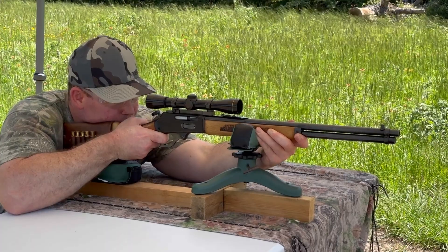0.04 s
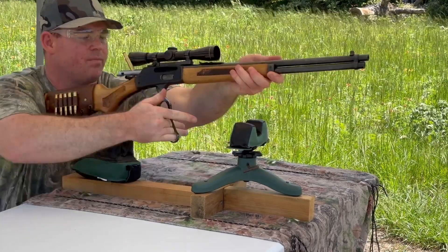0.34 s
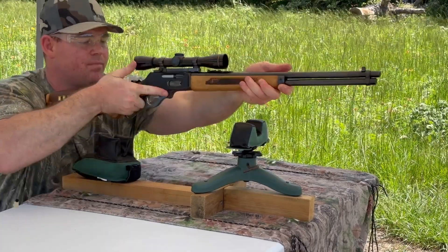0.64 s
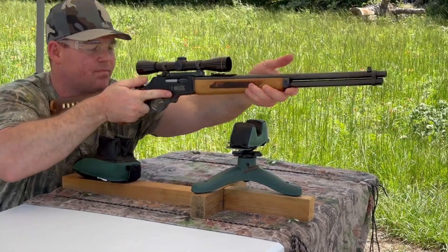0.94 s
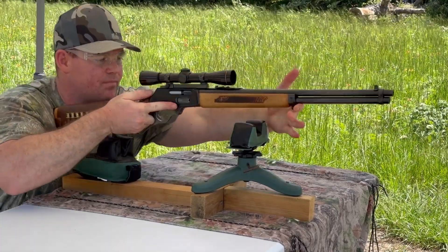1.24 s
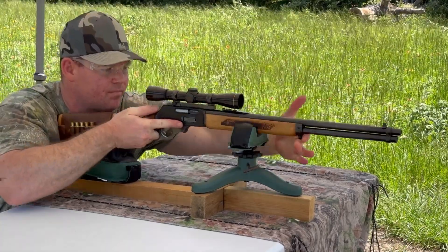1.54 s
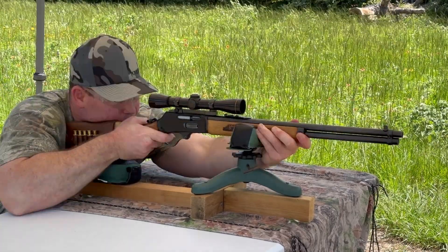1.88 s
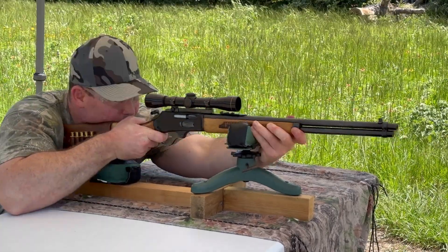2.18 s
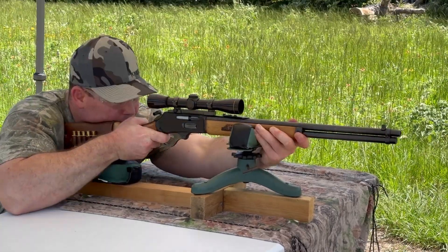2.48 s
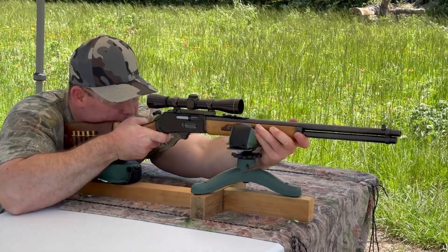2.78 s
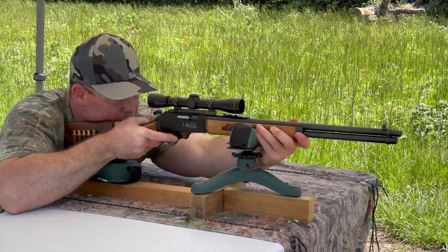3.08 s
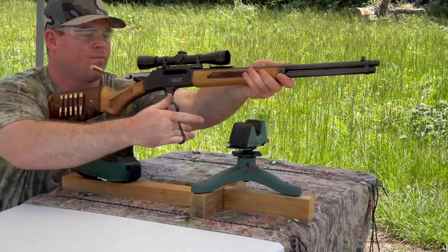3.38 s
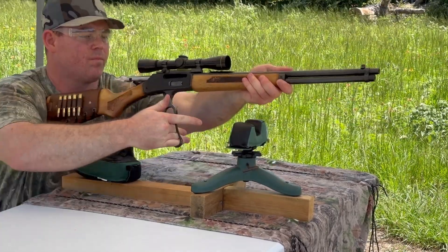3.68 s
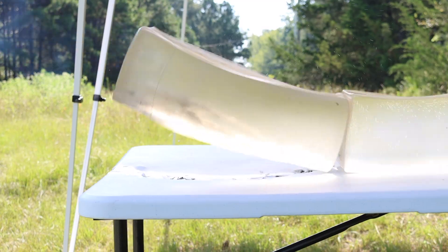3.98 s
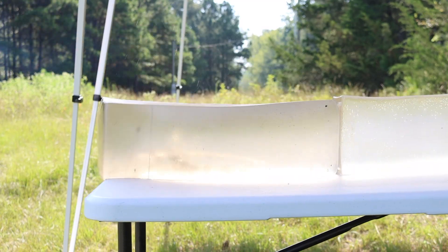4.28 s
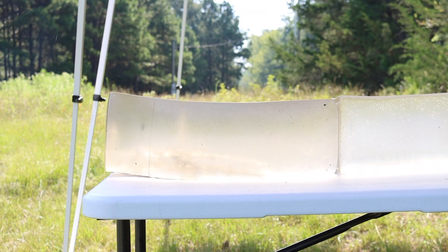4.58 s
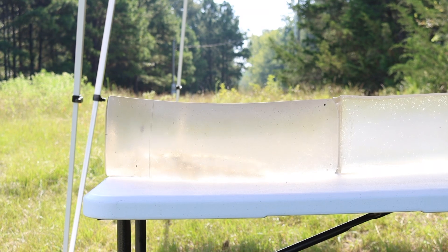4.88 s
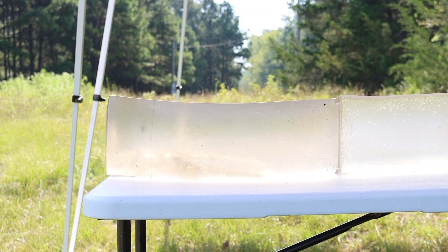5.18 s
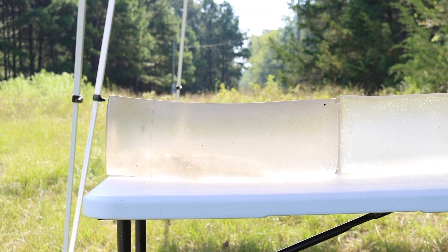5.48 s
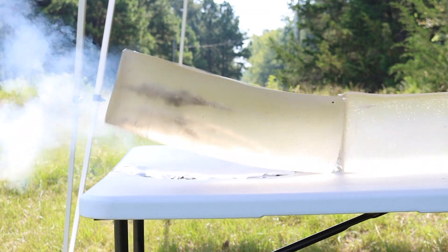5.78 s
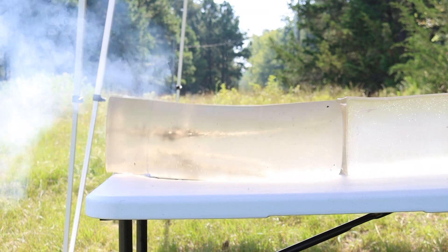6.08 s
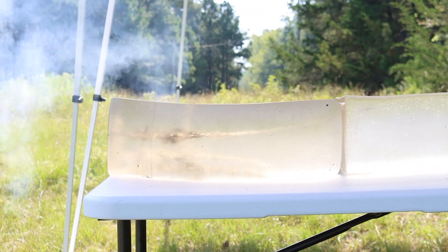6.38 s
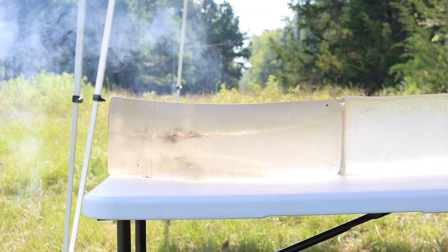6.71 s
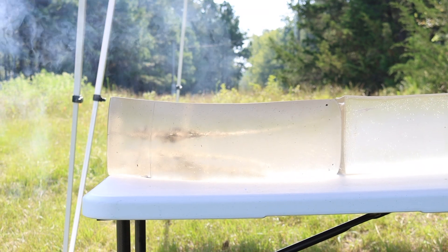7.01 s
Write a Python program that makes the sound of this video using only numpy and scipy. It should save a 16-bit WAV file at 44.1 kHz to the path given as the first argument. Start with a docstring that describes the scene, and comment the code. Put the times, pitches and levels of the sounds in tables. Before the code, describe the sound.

Outdoors, a rifle's lever clacks open and shut close to the microphone, and the empty brass case rings, thuds on a plastic table and bounces to rest. A sharp shot rolls back from the trees, and the lever opens again. The sound then shifts to a field, where two more shots crack about two seconds apart, each with a quick thump and a long echo, over faint insects and a low hum.

```python
"""Rifle shots and their echoes

At an outdoor bench a rifle's lever rattles, the empty brass case rings, drops and bounces, and a shot
rolls back from the trees. Two more shots follow in a field, beside a gel block on a table, where insects
sing and something hums. Each blast is short and choked; its echo swells up and dies away, treble first."""
import sys
import numpy as np
from scipy import signal
from scipy.fft import rfft, irfft
from scipy.io import wavfile
from scipy.ndimage import uniform_filter1d

SR = 44100
rng = np.random.default_rng(int(sys.argv[2]) if len(sys.argv) > 2 else 0)


def wrap_up_sound(samples):
    """Save the sound to the file named by the first command line argument, as 16-bit audio."""
    columns = np.atleast_2d(samples).T
    # keep every value between -1 and 1, then stretch to whole-number steps
    tamed = np.clip(columns, -1, 1)
    steps = np.round(tamed * 32767).astype(np.int16)
    wavfile.write(sys.argv[1], SR, steps)


N = 319725
TIME = np.arange(N) / SR
BINS = np.fft.rfftfreq(4096, 1 / SR)  # the pitches at which filters are set [Hz]
BENCH_SHOT_S, SCENE_CHANGE_S, FIELD_START_S = 2.178, 3.8, 3.838

# how alike left and right are, for close sounds and all around each place: (pitch [Hz], likeness [-1 to 1])
CLOSE = [(100, 0.89), (2000, 1), (5000, 0.85), (8000, 0.36), (11000, .25), (16000, .3)]
BENCH_LIKENESS = [(30, .8), (80, .93), (200, .78), (450, 0.31), (1400, 0.22), (2200, 0.99), (5000, 0.88),
                  (8000, .3), (16000, .2)]
FIELD_LIKENESS = [(30, 0.89), (100, 1), (250, 0.96), (600, 0.67), (1300, .25), (2500, -0.15),
                  (5000, -0.026), (8000, 0.26), (16000, -0.24)]
# tone of the outdoor background at each place: (pitch [Hz], level [dB])
BENCH_AIR = [(20, -30), (40, -6.5), (70, 0), (150, -3.5), (230, -14), (480, -21), (900, -26.5), (1500, -30),
             (3000, -34), (4900, -30), (6000, -34), (7400, -31), (10000, -38.5), (14500, -30.5),
             (16000, -34)]
FIELD_AIR = [(25, -23), (55, -8.5), (85, 1), (140, -5), (260, -1.5), (400, -15.5), (900, -21), (1500, -27),
             (2500, -22.5), (4000, -14.5), (7500, -18.5), (10000, -24.5), (15500, -37.5)]
# how the bench background rises and falls: (time [s], level [dB])
BENCH_AIR_LEVELS = [(0, -63.5), (0.8, -51.5), (1.5, -52), (2.1, -53.5), (3.1, -59), (3.45, -54.5),
                    (3.785, -60.5), (3.795, -100)]
# tone of the echo at its height: (pitch [Hz], level [dB])
BENCH_ECHO = [(18, -38), (30, -14), (174, -1.5), (319, -15), (666, -5), (1130, -9.5), (2170, -9.5),
              (3980, -19), (6720, -18), (7670, -21.5), (8300, -57), (8980, -29.5), (9710, -24),
              (14000, -44.5), (16000, -49)]
FIELD_ECHO = [(24, -54.5), (40, -55), (81, -12), (155, -2.5), (392, -10.5), (965, -1.5), (1090, -3),
              (1630, -1.5), (2440, -5.5), (3740, -15), (5050, -16), (6020, -21), (10700, -27), (13100, -33),
              (16000, -84)]
# how each pitch of the echo gains or fades against the whole: (pitch [Hz], change [dB per s])
BENCH_FADE = [(60, 5), (200, 4), (400, -1.5), (1000, 8), (2500, -0.5), (5000, -10.5), (10000, -21.5),
              (16000, -42.5)]
FIELD_FADE = [(60, -12), (200, 4.5), (400, 10), (900, 10), (2000, -1.5), (4000, -5), (8000, -31),
              (16000, -60)]
# echoes at the bench, the first from a shot already fired: (shot time [s], level [dB], end [s])
BENCH_ROLLS = [(-0.95, -26, 0.156), (BENCH_SHOT_S, -26.5, 3.17)]
# a faint, dull roll from far off: (start [s], level [dB], end [s])
FAR_ROLL = (1.13, -44.5, 1.63)
# single returns that stand out of the echo: (time [s], level [dB], fade time [s])
SLAPS = [(2.408, -21.5, 0.052), (2.567, -25, 0.067), (2.784, -32, 0.24), (4.179, -26.5, 0.18),
         (6.2, -28, 0.027)]
# tone of the rifle's steel parts: (pitch [Hz], level [dB])
STEEL_TONE = [(120, -69), (200, -17), (601, -10.5), (735, -9.5), (950, -0.5), (1210, -7), (2910, 0.5),
              (3620, -5.5), (6640, -3.5), (8270, -12), (8900, -4.5), (9750, -1), (11700, -9.5), (14600, -7),
              (16000, -25.5)]
# ringing notes of the rifle's steel frame: (pitch [Hz], level [dB], fade time [s])
FRAME_NOTES = [(1696, -13.5, .04), (2800, -6, 0.048), (3140, -5.5, 0.049), (3460, -8, 0.03),
               (5300, -27.5, 0.02)]
# the lever opens, shuts and opens: (start [s], stop [s], scrape [dB], ring [dB])
STROKES = [(0.188, 0.2784, -32, -18), (0.431, 0.542, -35, -30.5), (3.182, 3.268, -33, -37)]
# hammer, lifter and lock knock: (time [s], level [dB], fade time [s], treble tilt [dB per octave])
KNOCKS = [(0.1928, -34, .07, 4), (0.2026, -26, 0.075, 9), (0.2092, -25.5, .015, -2),
          (0.2392, -27, .03, 3.5), (0.2515, -28, .065, 5), (0.2801, -20, 0.037, 2.5),
          (0.436, -31, 0.057, -1), (0.4541, -20.5, 0.065, 2.5), (0.4989, -22.5, 0.028, 3),
          (0.527, -16, .08, 0.5), (0.5361, -14, .06, 3.5), (0.546, -20.5, .075, 1.5),
          (3.194, -22.5, 0.036, -0.5), (3.2097, -31.5, 0.029, -5), (3.2334, -26, .022, 1.5),
          (3.2585, -23, .027, -2.5), (3.2732, -21.5, 0.066, -0.5)]
# ringing notes of the brass case: (pitch [Hz], level [dB], fade time [s])
BRASS_NOTES = [(7270, -26, 0.19), (10820, -15.5, 0.24), (12300, -6.5, .13), (12310, -4, 0.19),
               (12400, -11, 0.21), (15300, -17.5, .12), (15290, -12, .13)]
# the empty case is flicked out: (time [s], level [dB])
EJECTIONS = [(0.282, -15.5), (3.273, -16)]
# it lands on the plastic table top: (time [s], level [dB], fade time [s])
LANDING = (0.6245, -11, 0.095)
# tone of the table's thud: (pitch [Hz], level [dB])
TABLE_TONE = [(47, -35.5), (80, -15.5), (130, 4), (316, -3), (451, -9), (734, -5.5), (1090, -19.5),
              (1900, -22.5), (2380, -10.5), (3320, -26), (6450, -28), (8410, -41.5), (12800, -39.5),
              (16000, -50.5)]
# tone of the hard surface where the case bounces: (pitch [Hz], level [dB])
SURFACE_TONE = [(150, 0.5), (450, 1), (1150, 1.5), (1500, -1), (2100, -4), (2650, -2.5), (3150, -10.5),
                (3800, -11), (4500, -13), (5700, -12), (7000, -20.5), (10000, -17.5), (16000, -25)]
# ringing notes of the table and of each bounce: (pitch [Hz], level [dB], fade time [s])
TABLE_NOTES = [(133.9, -12.5, 0.33), (185.4, -7.5, 0.17), (294.5, -12.5, 0.053), (454, -12, 0.1),
               (574, -5.5, 0.077), (729, -9, 0.079), (2340, -0.5, 0.034)]
BOUNCE_NOTES = [(1170, -5.5, 0.11), (1485, 4, 0.04), (1763, -8, 0.06), (2550, 0.5, 0.034),
                (2700, -4, 0.037), (3570, 3, 0.032), (3690, -5.5, 0.032), (5260, -8, 0.039)]
# a brief ring as the rifle fires: (pitch [Hz], level [dB], fade time [s])
FIRING_NOTES = [(1720, -25.5, 0.042), (2505, -25.5, 0.055)]
# bands of insect song: (pitch [Hz], width [Hz], level [dB])
INSECT_BANDS = [(4750, 760, -3.5), (8220, 880, 0.5)]
# notes of the low hum: (pitch [Hz], level [dB])
HUM_NOTES = [(79.5, -47.5), (161, -53), (243, -52.5)]
# shots in the field: (time [s], crack [dB], gas [dB], gas hold [s], thump delay [s], thump [dB],
# echo [dB], time until the background is back [s])
FIELD_SHOTS = [(3.8793, -21, -25, 0.013, 0.1056, -10.5, -23.5, 1.56),
               (5.7242, -17.5, -22, 0.013, 0.1037, -13, -22.5, 1.28)]
# the block and debris settle: (time [s], level [dB], fade time [s], lowest pitch [Hz], highest pitch [Hz])
TICKS = [(4.085, -41, 0.067, 11500, 13000), (4.694, -42, 0.072, 5000, 9600),
         (5.995, -29, 0.079, 8100, 10300), (6.492, -33.5, 0.096, 5760, 10500)]
# thin rings after the last shot: (time [s], level [dB])
PINGS = [(5.92, -40), (6.04, -40), (6.205, -34.5)]
# their one note: (pitch [Hz], level [dB], fade time [s])
PING_NOTE = [(5170, 0, 0.22)]


def amp(db):
    """Turns decibels into a gain to multiply by."""
    return 10 ** (np.asarray(db) / 20)


def evened(x):
    """Scales a signal to an average power of 1."""
    return x / np.sqrt(np.mean(x ** 2) + 1e-20)


def read(points, hz=BINS):
    """Reads a table at the given pitches, blending between its rows."""
    pitch, value = np.transpose(points)
    return np.interp(np.log(hz + 1), np.log(pitch + 1), value)


def gate(start, end, ramp):
    """1 between two times, with straight ramps to 0 outside them."""
    return np.clip(1 + np.minimum(TIME - start, end - TIME) / ramp, 0, 1)


def dying(age, fade):
    """Stays at 1 until age 0, then drops 60 dB in every fade time."""
    return np.exp(-np.log(1000) * np.maximum(age, 0) / fade)


def wobble(size):
    """A random wander, smoothed over size samples."""
    return evened(uniform_filter1d(rng.standard_normal(N), size))


def add(mix, s, sound):
    """Mixes a stereo sound in, starting at s seconds."""
    part = mix[:, round(s * SR):][:, :sound.shape[1]]
    part += sound[:, :part.shape[1]]


def noise(likeness, size=N):
    """Stereo hiss; a table or one number says how alike the two sides are."""
    a, b = rfft(rng.standard_normal((2, size)))
    same = likeness if np.isscalar(likeness) else read(likeness, np.fft.rfftfreq(size, 1 / SR))
    mid, side = a * np.sqrt((1 + same) / 2), b * np.sqrt((1 - same) / 2)
    return irfft([mid + side, mid - side], size)


def colour(x, db):
    """Filters a sound to the tone curve db, with no ringing ahead of the sound."""
    log_gain = np.log(amp(np.maximum(db - db.max(), -100)))
    mirrored = np.r_[log_gain, log_gain[-2:0:-1]]
    taps = np.fft.ifft(np.exp(np.conj(signal.hilbert(mirrored)))).real
    return signal.oaconvolve(x, taps[None], axes=1)[:, :x.shape[1]]


def band(low_hz, high_hz, order=6):
    """Tone curve in dB that keeps one range of pitches; a higher order has steeper edges."""
    return -10 * np.log10((1 + (low_hz / (BINS + 1)) ** (order - 2)) * (1 + (BINS / high_hz) ** order))


def hiss(db, likeness):
    """Steady noise with the tone curve db."""
    return evened(colour(noise(likeness), db))


def strike(rise, fade):
    """Loudness of a hit: it climbs to 1 in rise seconds, then dies away."""
    t = TIME[:16384]
    return np.sin(np.pi / 2 * np.minimum(t / rise, 1)) ** 2 * dying(t - rise, fade)


def burst(db, rise, fade, likeness=CLOSE):
    """A dying cloud of vibrations with the tone curve db."""
    shape = strike(rise, fade)
    return evened(colour(noise(likeness, len(shape)) * shape, db)) * np.sqrt(np.mean(shape ** 2))


def ring(notes, rise, spread):
    """Pure notes that die away; spread is how far left and right are out of step, in radians."""
    out = 0
    for hz, db, fade in notes:
        shape = strike(rise, fade)
        phase = rng.uniform(0, 2 * np.pi) + spread * rng.choice([-.5, .5]) * np.array([[1], [-1]])
        out = out + amp(db) * shape * np.sin(2 * np.pi * hz * TIME[:len(shape)] + phase)
    return out


def gas(db, hz, rise, fade, same):
    """A puff of blast noise between two pitches; same is its left-right likeness."""
    return amp(db) * burst(band(*hz), rise, fade, same)


def thump(db, hz, rise, fade, lag=0):
    """A quickly dying swing of air pressure, lag seconds later in the right ear."""
    shape = strike(rise, fade)
    t = TIME[:len(shape)]
    shape = np.where(t < rise, np.sqrt(shape), shape)  # pressure builds steeply
    swing = shape * np.cos(2 * np.pi * hz * (t - np.array([[0], [lag]])))
    balanced = colour(swing, band(0.42 * hz, 2500))  # push and pull cancel, leaving no steady pressure
    return amp(db) * amp([[1.1], [-1.1]]) * balanced


def bench_air():
    """Distant rumble and hiss around the bench, a little to the left."""
    s, db = np.transpose(BENCH_AIR_LEVELS)
    loudness = amp(np.interp(TIME, s, db, right=-200))
    return hiss(read(BENCH_AIR), BENCH_LIKENESS) * loudness * amp([[.9], [-.9]])


def roll(shot_s, db, end_s, crest_db, loss_db_per_s):
    """Loudness of an echo: it swells from the edge of the wood, then spreads out and is soaked up."""
    edge_s, swell_s, depth_s = 0.13, 0.045, 0.43
    age = TIME - shot_s
    swell = 1 - np.exp(-np.maximum(age - edge_s, 0) / swell_s)
    swell *= amp(-crest_db * np.clip(1 - age / depth_s, 0, 1))
    swell = np.maximum(swell, amp(-25.5))  # open ground scatters a little back first
    late = np.maximum(age, depth_s)
    spreading_db = 8 * np.log2(late / depth_s)  # 8 dB for each doubling of the path
    absorbed_db = loss_db_per_s * (late - depth_s)
    return amp(db - spreading_db - absorbed_db) * swell * gate(shot_s, end_s, ramp=0.0034)


def echo(height_s, tone, fade, likeness, lumpy_db, patchy_db):
    """Countless trunks throw the blast back; later returns have crossed more air and are duller."""
    lumps = amp(lumpy_db * wobble(90))
    hz, t, slices = signal.stft(noise(likeness) * lumps, SR, nperseg=1024)
    age = np.clip(t - height_s, -.15, 1.1)
    patches = uniform_filter1d(rng.standard_normal(slices.shape[1:]), size=9, axis=0)
    patches = evened(uniform_filter1d(patches, size=5, axis=1))  # uneven in both pitch and time
    gain = amp(read(tone, hz)[:, None] + read(fade, hz)[:, None] * age + patchy_db * patches)
    gain /= np.sqrt(np.mean(gain ** 2, axis=0))  # change the tone, not the loudness
    return evened(signal.istft(slices * gain, SR, nperseg=1024)[1][:, :N])


def trees():
    """The woods send back rolling echoes at both places, with a few single slaps."""
    out = np.zeros((2, N))
    for s, db, end in BENCH_ROLLS:
        wash = echo(s + 0.31, BENCH_ECHO, BENCH_FADE, BENCH_LIKENESS, lumpy_db=1, patchy_db=1.53)
        out += wash * roll(s, db, end, crest_db=-0.5, loss_db_per_s=10) * amp([[.5], [-.5]])
    far = echo(0.44, FIELD_ECHO, FIELD_FADE, BENCH_LIKENESS, lumpy_db=1.5, patchy_db=1.7)
    out += far * roll(*FAR_ROLL, crest_db=5.5, loss_db_per_s=39)
    for s, *_, db, _ in FIELD_SHOTS:
        wash = echo(s + 0.34, FIELD_ECHO, FIELD_FADE, FIELD_LIKENESS, lumpy_db=1.42, patchy_db=1.6)
        out += wash * roll(s, db, TIME[-1], crest_db=1.5, loss_db_per_s=4)
    for s, db, fade in SLAPS:
        add(out, s, gas(db, hz=(800, 4300), rise=0.0025, fade=fade, same=0.81))
    return out


def lever():
    """The bolt scrapes back and forth, parts knock and rattle, and each stop rings the frame."""
    steel_db, out, speed = read(STEEL_TONE), np.zeros((2, N)), 0
    for s, db, fade, tilt_db in KNOCKS:
        tone_db = steel_db + tilt_db * np.log2(np.maximum(BINS, 2000) / 5000)
        contact = amp(3) * burst(tone_db, rise=.0003, fade=.007)
        shiver = amp(-2.5) * burst(tone_db, rise=0.0018, fade=fade)
        add(out, s, amp(db) * (contact + shiver))
    for start, stop, scrape_db, ring_db in STROKES:
        to_go = np.clip((stop - TIME) / (stop - start), 0, 1)
        swell = amp(scrape_db - 10 * to_go)  # the scrape grows 10 dB as the bolt gathers speed
        speed += (TIME > start) * swell * dying(TIME - stop, fade=0.14)
        add(out, stop, amp(ring_db) * ring(FRAME_NOTES, rise=0.00041, spread=.2))
    speed += amp(-56.5) * gate(STROKES[0][1], STROKES[1][1], ramp=0.036)  # the open lever stirs in the hand
    catching = amp(3.5 * wobble(60))  # sliding steel grips and slips
    clicks = rng.standard_normal(N) * (rng.random(N) < 160 / SR)  # loose parts, about 160 a second
    rattle = signal.oaconvolve(clicks[None], burst(steel_db, rise=0.00034, fade=0.0068), axes=1)[:, :N]
    scrape = colour(noise(CLOSE) * catching, steel_db)
    return out + speed * (evened(scrape) + amp(-5.5) * evened(rattle))


def spent_case():
    """The brass rings as it flies out, thuds on the table, then bounces to rest."""
    brass, knocks = np.zeros((2, 2, N))
    s, db, fade = LANDING
    for at, ring_db in EJECTIONS + [(s, -44.5)]:  # it rings faintly on landing too
        add(brass, at, amp(ring_db) * ring(BRASS_NOTES, rise=0.01, spread=.45))
    thud = amp(-3) * burst(read(TABLE_TONE) + band(170, 16000), rise=.0012, fade=fade)
    table_ring = amp(-3.5) * ring(TABLE_NOTES, rise=0.0022, spread=.05)
    rim = amp(-16) * burst(band(900, 9000), rise=.0003, fade=0.008)  # the rim touches first
    add(knocks, s, amp(db) * (thud + table_ring) + rim)
    return brass + (knocks + bounces(s=0.9221, count=8)) * amp([[.6], [-.6]])


def bounces(s, count):
    """The case clacks on a hard surface, flat at first, then end to end, ever sooner and softer."""
    tip_s, flight_s, flight_share = 0.019, 0.1176, 0.497
    out = np.zeros((2, N))
    add(out, s, amp(-23) * burst(band(3500, 4500, order=12), rise=.0005, fade=0.038))  # the first hard bite
    for k in range(count):
        tone_db = read(SURFACE_TONE) + (band(1000, 4500) if k else band(130, 8960))
        rise = 0.0005 + 0.00029 * k * k  # later contacts are less sudden
        clack = burst(tone_db, rise, fade=0.1) + amp(3.5) * burst(tone_db, rise, fade=0.0087)
        rim = amp(-16) * burst(band(6950, 15000), rise, fade=0.037)
        top_hz = 5600 * 0.72 ** k  # softer contacts wake fewer high notes
        clink = colour(ring(BOUNCE_NOTES, rise, spread=0.23), band(100, top_hz))
        loss_db = (3.5 + 0.5 * k) * k
        add(out, s, amp(-19 - loss_db) * (clack + rim + clink))
        add(out, s, amp(-33.5 - 19 * k) * ring(BRASS_NOTES, rise=0.0086, spread=0.47))
        s += tip_s + flight_s * flight_share ** k  # time to tip over, plus an ever shorter flight
    return out


def bench_shot():
    """A first push of air, a sharp crack, a choked boom, then returns from the surroundings."""
    out, s = np.zeros((2, N)), BENCH_SHOT_S
    add(out, s - .022, ring(FIRING_NOTES, rise=0.011, spread=1.2))
    push = thump(db=-8.5, hz=240, rise=.015, fade=.014, lag=-0.00047)
    push += gas(db=-25.5, hz=(300, 900), rise=.009, fade=0.055, same=.24)
    crack = gas(db=-21.5, hz=(500, 4500), rise=0.00058, fade=0.007, same=.7)
    crack += gas(db=-26, hz=(9000, 15000), rise=.0004, fade=.018, same=.4)
    body = gas(db=-13.5, hz=(248, 715), rise=.0006, fade=.12, same=1)
    boom = thump(db=-13.5, hz=66.4, rise=0.011, fade=0.065, lag=-.0014)
    boom += gas(db=-18, hz=(130, 890), rise=0.01, fade=0.059, same=.5)
    sizzle = gas(db=-41.5, hz=(1500, 10900), rise=0.0077, fade=0.3, same=0.85)
    near_return = thump(db=-22, hz=154, rise=0.001, fade=.073)
    near_return += gas(db=-30, hz=(250, 443), rise=0.0052, fade=0.035, same=0.74)
    rumble = gas(db=-36, hz=(110, 650), rise=0.084, fade=.7, same=.7)
    fizz = gas(db=-53, hz=(11800, 15000), rise=0.13, fade=.7, same=.3)
    far_return = thump(db=-27, hz=111, rise=0.031, fade=0.1)
    for delay, sound in [(-.017, push), (0, crack + body), (.01, boom), (.072, sizzle),
                         (.077, near_return), (.15, rumble + fizz), (.612, far_return)]:
        add(out, s + delay, sound)
    return out


def insects():
    """Insects in the grass: two narrow bands of song with a thin fizz above."""
    song = sum(amp(db) / (1 + (2 * (BINS - hz) / width) ** 4) for hz, width, db in INSECT_BANDS)
    chorus = amp(-45.5) * hiss(20 * np.log10(song), likeness=[(5000, 0.4), (8000, 0.99)])
    return chorus + amp(-59.5) * hiss(band(10500, 13500), likeness=.3)


def hum():
    """Three low notes whose pitch wavers together."""
    wavering_time = np.cumsum(1 + 0.0111 * wobble(6000)) / SR
    return amp(0.2) * sum(amp(db) * np.sin(2 * np.pi * hz * wavering_time) for hz, db in HUM_NOTES)


def field_background():
    """Distant rumble and hiss, insects and hum; all dip after a shot and creep back."""
    air_db_per_s, insect_db_per_s = 6, 15
    wait = sum((TIME > s) * np.maximum(s + back - TIME, 0) for s, *_, back in FIELD_SHOTS)
    air = amp(-44) * hiss(read(FIELD_AIR), FIELD_LIKENESS)
    out = insects() * amp(-insect_db_per_s * wait) + (air + hum()) * amp(-air_db_per_s * wait)
    return out * gate(FIELD_START_S, TIME[-1], ramp=0.015)


def field_shots():
    """Each shot is a crack and a rush of gas; a tenth of a second later a short swell ends in a thump."""
    out = np.zeros((2, N))
    for s, crack_db, gas_db, hold, delay, thump_db, _, _ in FIELD_SHOTS:
        add(out, s - .011, gas(db=-37.5, hz=(1500, 9000), rise=.008, fade=.05, same=.3))  # a hiss leads in
        add(out, s, gas(crack_db, hz=(790, 13500), rise=0.0026, fade=0.031, same=0.22))
        rush = hiss(band(220, 5900), likeness=0.16) * gate(s, TIME[-1], ramp=0.0012)
        out += amp(gas_db) * rush * dying(TIME - s - hold, fade=0.19)
        add(out, s + delay - .029, gas(db=-33.5, hz=(500, 6840), rise=0.024, fade=0.34, same=0.15))
        add(out, s + delay, thump(thump_db, hz=207, rise=0.0045, fade=0.0081, lag=0.00033))
    return out


def settling():
    """Small ticks and thin rings as the block and debris settle after the blasts."""
    out = np.zeros((2, N))
    for s, db, fade, low_hz, high_hz in TICKS:
        add(out, s, amp(db) * burst(band(low_hz, high_hz, order=16), rise=0.0028, fade=fade, likeness=.33))
    for s, db in PINGS:
        add(out, s, amp(db) * ring(PING_NOTE, rise=0.011, spread=0.9))
    return out


def scene():
    """The close sounds at both places, with the echoes and backgrounds around them."""
    close = lever() + spent_case() + bench_shot() + field_shots() + settling()
    return close + trees() + bench_air() + field_background()


def record(dry):
    """Cuts a thin treble band at the bench, dips before the last shot, softens peaks, trims the top."""
    notch = signal.butter(4, (7680, 8900), "bandstop", fs=SR, output="sos")
    out = np.where(TIME < SCENE_CHANGE_S, signal.sosfilt(notch, dry), dry)
    gap = (TIME > 5.675) & (TIME < 5.706)  # a moment of near silence
    out *= 1 - .995 * uniform_filter1d(gap.astype(float), size=300)
    out = 0.69 * np.tanh(out / 0.71)  # gentle overload
    treble_cut = signal.firwin(301, 16000, window=("kaiser", 8), fs=SR)
    return signal.oaconvolve(out, treble_cut[None], "same", axes=1)


dry = scene()
out = record(dry)
wrap_up_sound(out)
```